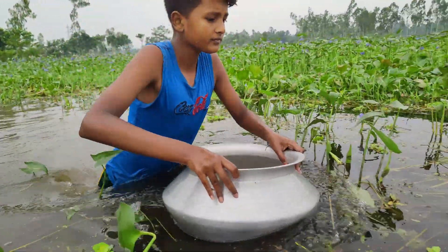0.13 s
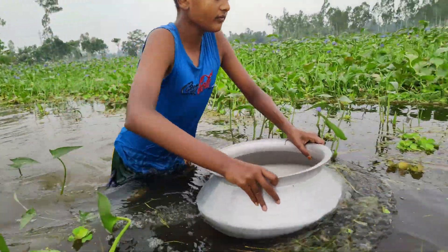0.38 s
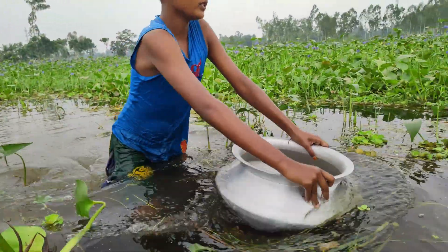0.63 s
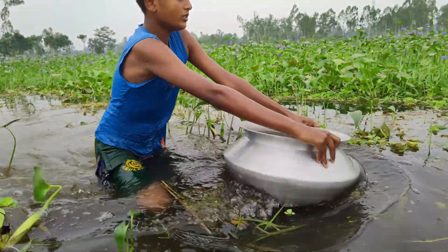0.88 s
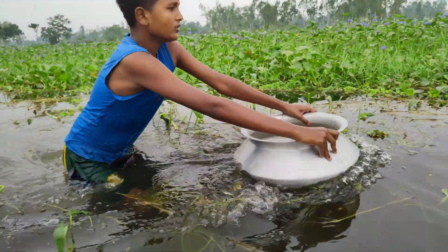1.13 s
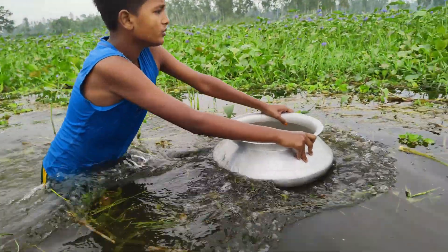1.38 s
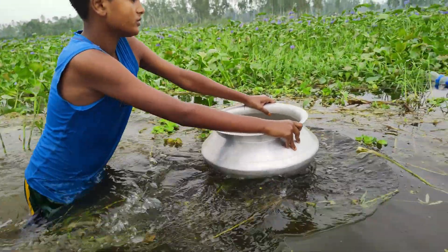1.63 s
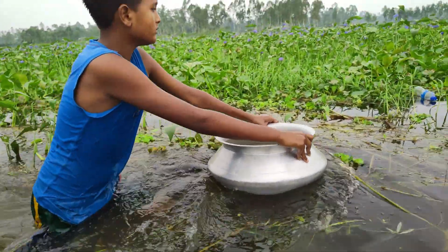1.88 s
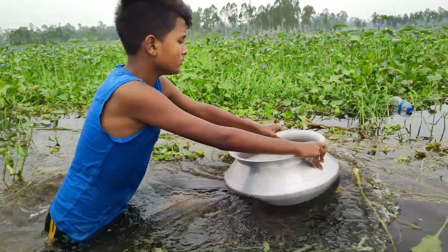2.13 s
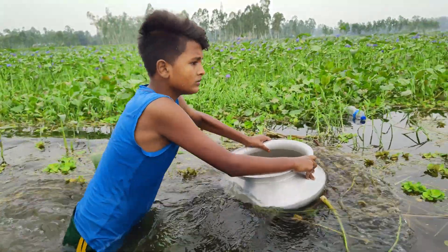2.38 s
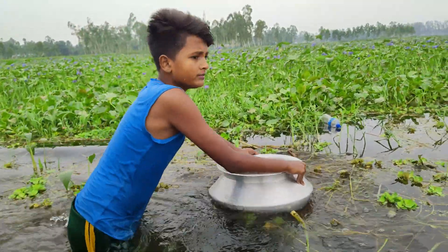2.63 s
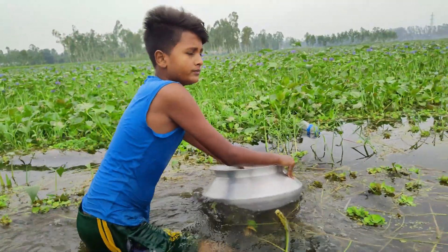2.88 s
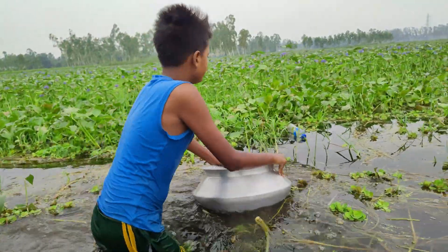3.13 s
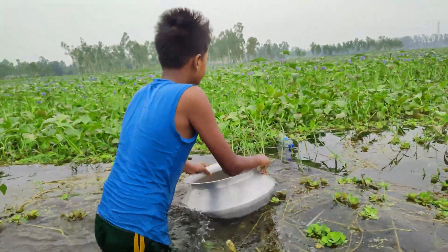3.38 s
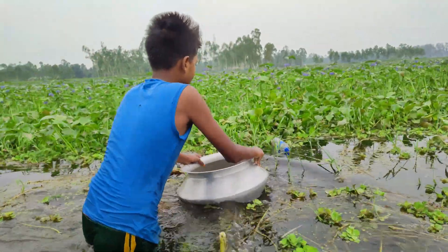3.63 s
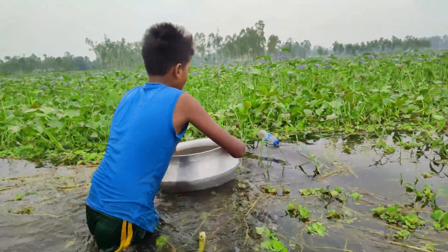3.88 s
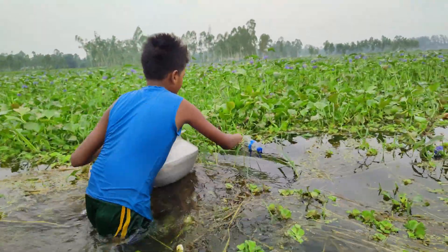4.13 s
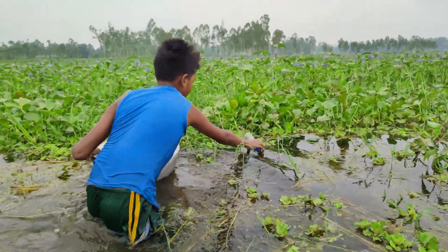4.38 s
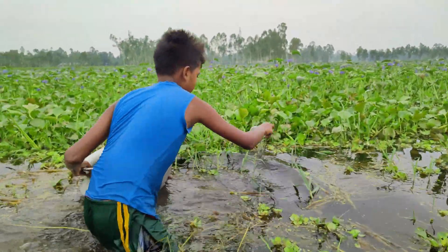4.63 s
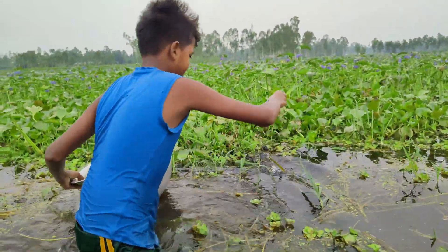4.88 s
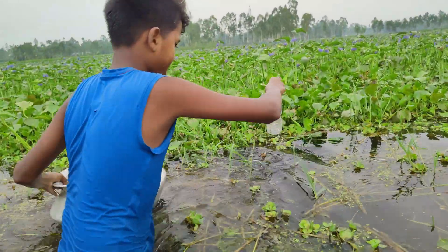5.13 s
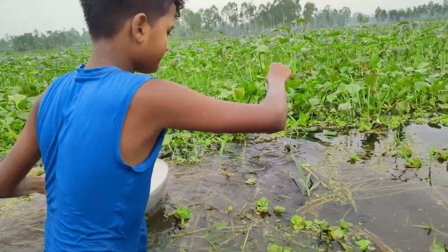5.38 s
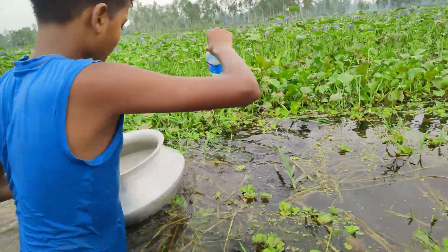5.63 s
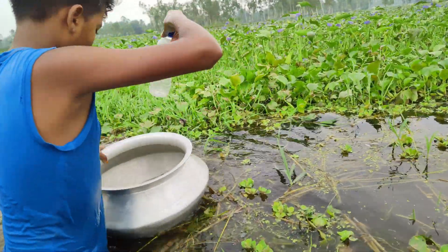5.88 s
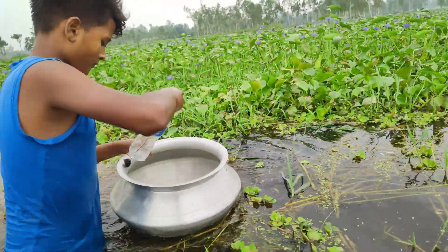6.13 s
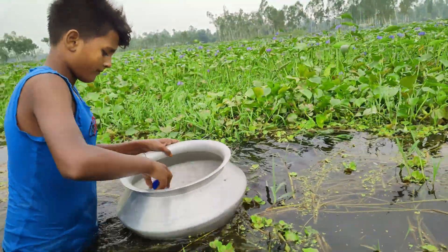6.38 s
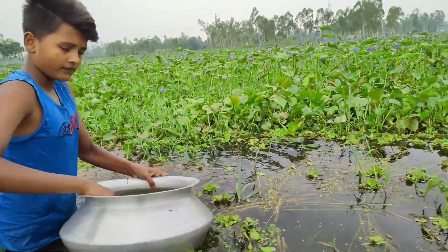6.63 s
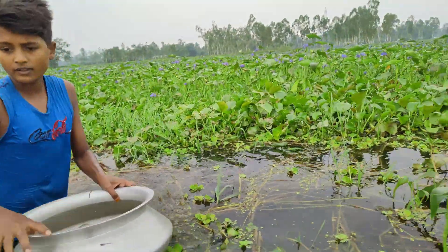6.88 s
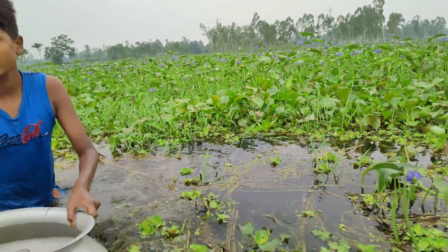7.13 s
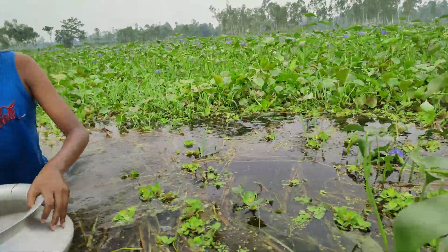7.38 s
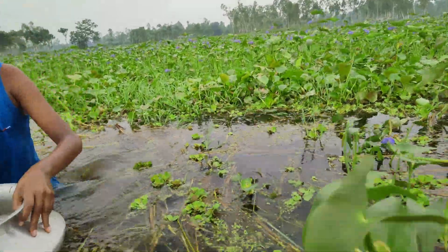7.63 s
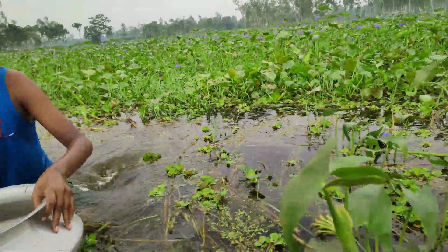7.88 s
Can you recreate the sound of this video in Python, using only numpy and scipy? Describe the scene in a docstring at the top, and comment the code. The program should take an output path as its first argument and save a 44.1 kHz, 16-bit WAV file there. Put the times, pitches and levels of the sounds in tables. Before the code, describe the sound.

Someone wades through shallow weedy water with bubbly sloshing, wind buffets the microphone, and a plastic bottle clatters into a floating metal pot.

```python
"""Wading with a floating pot

Someone wades through shallow floodwater: noise wash, swarms of rising sines and puffs of spray make the slosh.
A plastic bottle knocks and crackles on the floating metal pot (contact noise rings damped modes);
its lowest wall mode hums when stems drag along it. Floating leaves rustle as patchy noise.
Gusts, as low filtered pushes, buffet the two microphone ports separately, the left one most."""
import sys
import numpy as np
from scipy import signal
from scipy.fft import rfft, irfft, next_fast_len
from scipy.io import wavfile
from scipy.ndimage import uniform_filter1d, map_coordinates

SR = 44100
rng = np.random.default_rng(int(sys.argv[2]) if len(sys.argv) > 2 else 0)


def dump(signal):
    """Clip the signal to [-1, 1] and save it as 16-bit WAV at the path in sys.argv[1]."""
    limited = np.clip(np.atleast_2d(signal).T, -1, 1)
    pcm = np.round(limited * 32767).astype(np.int16)
    wavfile.write(sys.argv[1], SR, pcm)


def attenuation_scalar(level_db):
    """Turn a level in dB into a linear amplitude multiplier (20 dB per decade)."""
    decades = np.asarray(level_db, float) / 20
    return 10 ** decades


N = 353196

# Spectrum of the churned water. Each row: frequency in Hz, relative level in dB.
SLOSH_SPECTRUM = [(150, -11), (250, -9.5), (354, -16), (510, -13.5), (629, -7.5), (1140, -10.5),
                  (1700, -1.5), (3170, 0), (4400, -7), (4900, -18), (6600, -16), (7300, -32),
                  (11300, -26.5), (16000, -45)]
# Colour difference of the ports. Each row: frequency in Hz, left minus right in dB (sources scale it).
PORT_COLOUR = [(60, 7), (240, 1.5), (950, -2.5), (3770, -5.5), (15000, -15)]


def unit(x):
    """x scaled to rms 1."""
    return x / np.sqrt(np.mean(x ** 2) + 1e-20)


def along(points, hz):
    """(Hz, value) points interpolated on a log axis."""
    f, v = np.transpose(points)
    return np.interp(np.log(hz + 1), np.log(f + 1), v)


def curves(rows):
    """One value per sample for each column after the time."""
    s, *cols = np.transpose(rows)
    return [np.interp(np.arange(N) / SR, s, c) for c in cols]


def wobble(rate_hz):
    """A smooth random curve, rate_hz knots a second."""
    knots = rng.standard_normal(int(N * rate_hz / SR) + 4)
    return map_coordinates(knots, [np.arange(N) * rate_hz / SR])


def filtered(x, response):
    """x times a response of frequency."""
    m = next_fast_len(N + 8192)
    return irfft(rfft(x, m) * response(np.fft.rfftfreq(m, 1 / SR)), m)[..., :N]


def band(x, lo_hz, hi_hz):
    """x scaled so that one band of it has rms 1."""
    return x / np.std(filtered(x, lambda hz: (hz > lo_hz) & (hz < hi_hz)))


def swells(rows, rise_db_per_s, fall_db_per_s):
    """Level in dB of (s, dB, held s) events that rise, hold and fall; the strongest one rules."""
    t, out = np.arange(N) / SR, np.full(N, -200.)
    for s, db, held_s in rows:
        before_s, after_s = np.maximum(s - t, 0), np.maximum(t - s - held_s, 0)
        out = np.maximum(out, db - rise_db_per_s * before_s - fall_db_per_s * after_s)
    return out


def lead_at(s):
    """Seconds by which the left port hears the wader first."""
    # Each row: time in seconds, left lead in microseconds.
    bearing = [(0, 72), (.6, -100), (1.4, -13.5), (2.1, -100), (2.6, -4.5), (3.1, 265), (3.7, 31),
               (4.8, 63), (5.5, -200), (6.2, 249), (7.8, 443)]
    return np.interp(s, *np.transpose(bearing)) / 10 ** 6


def blips(s, db, hz, life_s, climb_oct, pan_db, lead_s):
    """Stereo sum of soft-starting sines whose pitch climbs linearly, at first by climb_oct octaves per life."""
    t = np.arange(int(np.max(life_s) * 2.5 * SR) + 8) / SR
    u = t / life_s[:, None]
    phase = 2 * np.pi * hz[:, None] * t * (1 + np.log(2) * climb_oct[:, None] * u / 2)
    envelope = np.e * 2.6 * u * np.exp(-2.6 * u)  # peaks at 1
    wave = attenuation_scalar(db)[:, None] * envelope * np.sin(phase)
    out = []
    for side in (1, -1):  # left, right
        at = np.round((s - side * lead_s / 2) * SR).astype(int)[:, None] + np.arange(len(t))
        gain = attenuation_scalar(side * pan_db / 2)[:, None]
        out.append(np.bincount(np.clip(at, 0, N).ravel(), (gain * wave).ravel(), N + 1)[:N])
    return np.array(out)


def bursts(s, db, t60_s, hz, width=0.55):
    """Tiny decaying puffs of noise around hz where droplets break; partly alike at the two ports."""
    starts = np.bincount(np.clip(np.round(s * SR).astype(int), 0, N - 1), attenuation_scalar(db), N)
    decay = attenuation_scalar(-60 * np.arange(SR // 40) / SR / t60_s)
    shape = signal.fftconvolve(starts, decay)[:N]
    shared, left, right = rng.standard_normal((3, N))
    noise = np.array([0.4 * shared + left, 0.53 * shared + right])
    hiss = filtered(noise, lambda f: np.exp(-(np.log((f + 1) / hz) / width) ** 2))
    return shape * unit(hiss) * attenuation_scalar([[-2.5], [2.5]])


def spray(hz):
    """Droplets breaking at random, with noise puffs around one frequency."""
    when, size = rng.random((600, 2)).T
    db = 6 * np.minimum(-np.log(1 - size), 4.5)
    return unit(bursts(when * N / SR, db, t60_s=.007, hz=hz, width=.28))


def swarm(count, mid_hz, spread, cycles, size_db, scatter_s, climb_oct=0.057):
    """Random bubbles of many sizes, scattered around the wader; the ports colour them."""
    u, g = rng.random((count, 2)), rng.standard_normal((count, 5))
    s = u[:, 0] * N / SR
    hz = np.clip(mid_hz * np.exp(spread * g[:, 0]), 400, 15000)
    db = size_db * np.minimum(-np.log(1 - u[:, 1]), 3.2)
    life_s = np.minimum(cycles * np.exp(0.19 * g[:, 1]) / hz, .02)
    pan_db = along(PORT_COLOUR, hz) + 4 * g[:, 3]
    lead_s = lead_at(s) + scatter_s * g[:, 4]
    crowd = blips(s, db, hz, life_s, climb_oct * np.abs(g[:, 2]), pan_db, lead_s)
    return filtered(crowd, lambda f: attenuation_scalar(along(SLOSH_SPECTRUM, f)))


def patchy(spectrum, patchy_db, alike):
    """Stereo noise with time-frequency patches of random gain; the ports differ ever more toward the treble."""
    z = signal.stft(rng.standard_normal((2, N)), nperseg=256)[2]
    patches = uniform_filter1d(uniform_filter1d(rng.standard_normal(z.shape[1:]), 9, 0), 4, 1)
    pair = signal.istft(z * attenuation_scalar(patchy_db * unit(patches)), nperseg=256)[1][:, :N]

    def mid_side(hz):
        angle = np.arccos(np.clip(alike, 0, 1) / (1 + (hz / 1500) ** 2)) / 2
        return attenuation_scalar(along(spectrum, hz)) * [np.cos(angle), np.sin(angle)]

    mid, side = filtered(pair, mid_side)
    stereo = np.array([mid + side, mid - side])
    return filtered(stereo, lambda hz: attenuation_scalar(np.outer([.5, -.5], along(PORT_COLOUR, hz))))


def water():
    """Churned water: a patchy wash, swarms of bubbles, low glugs and fine spray, coming in clumps."""
    # Each row: time in seconds, slosh level in dB.
    wade = [(0, -54.5), (.28, -47), (.61, -50.5), (1.01, -43), (1.59, -42.5), (2.37, -53), (2.6, -49.5),
            (3.11, -46.5), (3.81, -55), (3.98, -45.5), (4.1, -42.5), (4.27, -34), (4.6, -38), (4.82, -45.5),
            (5.32, -52), (5.45, -65), (6.25, -69.5), (6.55, -53), (7, -53), (7.83, -55.5), (8, -59.5)]
    # Short splashes. Each row: time in seconds, slosh level in dB, held seconds.
    splashes = [(1.045, -35.5, 0.011), (2.56, -40.5, 0.0066), (5.63, -52.5, 0.0038), (6.06, -49, 0.058),
                (6.86, -45, 0.0085), (7.08, -44, 0.03)]
    # Each row: time in seconds, low glugs over the slosh in dB.
    glug_levels = [(0, -7.5), (2.4, -7.5), (2.66, -17.5), (3.1, -7), (3.95, -14), (4.3, -7), (5.3, -13.5),
                   (5.6, -33), (6.1, -7.5), (6.7, -17), (7.3, -0.5), (8, 0)]
    slosh_db = np.maximum(curves(wade)[0], swells(splashes, rise_db_per_s=170, fall_db_per_s=260))
    spray_db = -65.5 + 0.44 * (slosh_db + 52.5)  # grows more slowly than the slosh
    glug_db = slosh_db + curves(glug_levels)[0]
    clumps_db = 2.2 * wobble(24)

    wash = patchy(SLOSH_SPECTRUM, patchy_db=5, alike=0.67)
    deep = filtered(wash, lambda hz: 1 / (1 + (hz / 1000) ** 4))
    foam = swarm(count=4200, mid_hz=2100, spread=.55, cycles=10.6, size_db=5.5, scatter_s=0.000091)
    ticks = swarm(count=2500, mid_hz=3300, spread=0.49, cycles=2.3, size_db=7, scatter_s=1e-4)
    chirps = swarm(count=350, mid_hz=1400, spread=.4, cycles=20, size_db=4, scatter_s=1e-4, climb_oct=.45)
    glugs = swarm(count=300, mid_hz=809.0, spread=0.304, cycles=13.7, size_db=-2.5, scatter_s=1e-4)
    mist = spray(hz=4120) + attenuation_scalar(-7.5) * (spray(hz=7600) + spray(hz=11900))

    layers = ((-5.5, wash - deep), (-3.5, foam), (-8, ticks), (-14, chirps))
    body = sum(attenuation_scalar(db) * band(x, 900, 5000) for db, x in layers)
    low = attenuation_scalar(-3.5) * band(deep, 660, 950) + attenuation_scalar(-3.5) * band(glugs, 660, 950)
    fine = attenuation_scalar(spray_db - 5.5) * band(mist, 5450, 12300)
    return attenuation_scalar(clumps_db) * (attenuation_scalar(slosh_db) * body + attenuation_scalar(glug_db) * low + fine)


def wind():
    """Single eddies strike each port as short low pushes; the hardest ones thump."""
    # Each row: seconds at full strength, level in dB, held seconds, port.
    gusts = [(0, -16, 0.085, "L"), (0, -26, 0.0033, "R"), (.17, -27, 0.0076, "R"),
             (0.221, -19.5, 0.082, "L"), (.28, -24.5, 0.027, "R"), (0.464, -29.5, 0.0053, "L"),
             (1.008, -30, 0.022, "L"), (1.297, -28.5, 0.0029, "L"), (1.417, -24.5, 0.048, "L"),
             (1.728, -34, 0.0029, "R"), (1.913, -28.5, 0.0089, "R"), (1.99, -37.5, 0.025, "L"),
             (2.07, -32, 0.012, "R"), (2.56, -27, 0.049, "L"), (3.381, -33, 0.0066, "R"),
             (4.177, -25.5, 0.053, "L"), (4.49, -37, 0.013, "L"), (5.098, -18, 0.032, "L"),
             (5.24, -34.5, 0.064, "L"), (5.377, -26, 0.0016, "L"), (5.515, -30.5, 0.0057, "L"),
             (5.54, -40.5, .27, "R"), (5.719, -32, 0.0044, "L"), (5.863, -24, 0.0031, "L"),
             (5.96, -27, 0.017, "L"), (6.14, -31, 0.13, "L"), (6.39, -37.5, 0.13, "L"),
             (6.63, -39, 0.012, "R"), (6.693, -23.5, 0.022, "L"), (6.85, -34.5, 0.05, "R"),
             (6.922, -18, 0.0028, "L"), (6.969, -28, 0.22, "L"), (7.05, -32, 0.0034, "R"),
             (7.181, -20.5, 0.04, "L"), (7.22, -25.5, 0.0041, "R"), (7.269, -17.5, 0.04, "L"),
             (7.3, -31.5, .35, "R"), (7.35, -25, 0.15, "L"), (7.507, -18.5, 0.003, "L"),
             (7.65, -39.5, 0.18, "L"), (7.971, -34, 0.023, "L")]
    # Between the gusts. Each row: time in seconds, left level in dB, right level in dB.
    breeze = [(0, -64, -47), (1.4, -37.5, -64), (1.9, -55.5, -45), (2.7, -42, -50.5), (3.7, -60.5, -58.5),
              (5, -51.5, -57), (8, -65, -47.5)]
    # Hardest eddies, left port. Each row: centre in seconds, level in dB, centre to peak in ms.
    thumps = [(1.436, -9.5, 2.03), (5.101, -16, 1.5), (5.139, -7.5, 1.12), (5.379, -12.5, 1.3),
              (5.857, -6, 2.38), (6.923, -5.5, 1.4)]
    # Spectrum of the pushes. Each row: frequency in Hz, relative level in dB.
    buffet = [(8, -32.5), (20, 5), (60, 5), (160, -6), (300, -17.5), (450, -43.5), (900, -52.5),
              (1500, -120)]
    # Spectrum of the turbulence. Each row: frequency in Hz, relative level in dB.
    rasp_spectrum = [(150, -16), (300, 9), (500, -1.5), (1000, -19), (2000, -87)]
    gust_db = [swells([row[:3] for row in gusts if row[3] == port], rise_db_per_s=288, fall_db_per_s=222)
               for port in "LR"]
    level_db = np.maximum(curves(breeze), gust_db)

    # about 220 strikes a second on a rolling bed
    strikes = rng.standard_normal((2, N)) * (.05 + (rng.random((2, N)) < 220 / SR))
    eddies = unit(filtered(strikes, lambda hz: attenuation_scalar(along(buffet, hz))))
    running_rms = np.sqrt(np.abs(uniform_filter1d(eddies ** 2, SR // 14)) + 0.0069)
    # harder gusts shed smaller eddies that flutter in the port, a 170 Hz resonance
    edge = filtered(eddies, lambda hz: 1j * hz * 160 / (170 ** 2 - hz ** 2 + 1j * hz * 160))
    edge_db = 11.5 + 0.44 * level_db
    push = attenuation_scalar(level_db) * (eddies + attenuation_scalar(edge_db) * edge) / running_rms

    t = np.arange(N) / SR
    for s, db, half_ms in thumps:
        u = (t - s) * 1000 / half_ms
        push[0] -= attenuation_scalar(db) * u * np.exp((1 - u ** 2) / 2)  # pressure rises, then snaps back

    distortion = filtered(push * np.abs(push), lambda hz: hz ** 2 / (hz ** 2 + 250 ** 2))
    # turbulence riding on the strongest pushes
    rasp = unit(filtered(rng.standard_normal((2, N)), lambda hz: attenuation_scalar(along(rasp_spectrum, hz))))
    return push + 1.32 * distortion + attenuation_scalar(1.797 * level_db) * rasp


def leaves():
    """Floating leaves rustle as patchy noise, more when the stems are brushed."""
    # Each row: time in seconds, level in dB.
    rustle = [(0, -85.5), (6.85, -58.5), (7.3, -54.5), (7.55, -44), (7.74, -57.5), (7.95, -47.5)]
    # Each row: frequency in Hz, relative level in dB.
    leaf_spectrum = [(100, -41), (430, -31), (600, -17), (1500, -24), (2300, -0.5), (4400, -12),
                     (4900, -23.5), (6600, -20.5), (7300, -31.5), (16000, -60)]
    return attenuation_scalar(curves(rustle)[0]) * band(patchy(leaf_spectrum, patchy_db=4, alike=.7), 900, 5000)


def bubbles():
    """Single bubbles ring as climbing sines; the surface snaps as each one forms."""
    # Each row: start in seconds, relative level in dB, start pitch in Hz, life in ms.
    single_bubbles = [(.07, -33, 2000, 6.3), (.114, -27.5, 1980, 1.3), (.232, -38, 1700, 4.2),
                      (.251, -29, 2170, 1.5), (0.285, -28.5, 2100, 4.8), (0.553, -35.5, 2480, 5.2),
                      (0.786, -36, 427, 20), (1.035, -30, 2240, 5.2), (1.017, -32, 3980, 0.84),
                      (1.052, -17, 2670, 0.41), (1.057, -37, 1750, 5.6), (1.226, -31, 2380, 1.9),
                      (1.494, -33, 2400, 2.5), (1.171, -38, 1236, 22), (1.467, -27.5, 2104, 5.8),
                      (1.546, -30, 2880, 1.8), (1.58, -32.5, 3100, 3), (1.641, -31.5, 2580, 8.2),
                      (1.691, -32, 3460, 2.9), (1.771, -29, 3650, 0.67), (1.815, -33.5, 1840, 4.3),
                      (1.896, -36.5, 3830, 4.7), (1.938, -27.5, 2390, 3.8), (2.661, -36, 1670, 2.4),
                      (2.247, -36.5, 503, 21), (2.741, -37.5, 1990, 5.1), (2.852, -37.5, 2410, 6),
                      (3.071, -27, 2260, 2.2), (3.146, -36, 795, 14), (3.341, -36, 1960, 8.5),
                      (3.348, -40, 1360, 11), (3.362, -43.5, 476, 37), (3.468, -38.5, 727, 20),
                      (3.55, -41.5, 566, 24), (3.944, -38, 3200, 4), (3.947, -40, 1230, 10),
                      (3.975, -41, 3900, 4), (4.082, -25, 3150, 3.2), (4.097, -32.5, 926, 5.8),
                      (4.136, -26.5, 2040, 3.5), (4.167, -29, 3020, 4), (4.176, -18.5, 2320, 0.92),
                      (4.188, -31, 910, 10), (4.244, -29, 2100, 3.7), (4.259, -28, 3010, 4.9),
                      (4.21, -32.5, 1200, 8.9), (4.267, -23.5, 1730, 2.6), (4.308, -26.5, 934, 5.6),
                      (4.362, -27.5, 766, 3.5), (4.374, -31.5, 3950, 1.4), (4.395, -32, 1330, 6.2),
                      (5.116, -28.5, 2000, 0.47), (5.925, -37, 3700, 1.05), (7.019, -33, 724, 17.7),
                      (7.104, -35.5, 1850, 3), (7.232, -30.5, 3560, 1.8), (7.396, -39.5, 2920, 4),
                      (7.535, -40, 2250, 7), (7.61, -37, 750, 14), (7.671, -26, 2220, 1.7),
                      (7.84, -45, 740, 12)]
    s, db, hz, life_ms = np.transpose(single_bubbles)
    climb_oct = .0007 * life_ms ** 2  # longer lives climb further
    pan_db = 3.7 * along(PORT_COLOUR, hz)
    rings = blips(s, db - 1.0, hz, life_ms / 1000, climb_oct, pan_db, lead_at(s))
    return rings + bursts(s, db - 14, t60_s=.008, hz=3300)


def drops():
    """Drops burst on the surface as puffs of noise."""
    # Each row: start in seconds, relative level in dB.
    bursting = [(.232, -37), (.35, -42), (1.053, -33), (1.6077, -31), (1.774, -31), (2.8392, -38),
                (3.1074, -31), (3.345, -34), (4.1198, -30.5), (4.1633, -26), (4.4105, -26), (4.554, -27),
                (4.645, -34), (5.283, -29.5), (5.609, -38.5), (6.044, -31), (6.06, -31.5), (6.332, -27),
                (7.6718, -25)]
    s, db = np.transpose(bursting)
    return bursts(s, db - 11.0, t60_s=0.011, hz=5800, width=0.58)


def plops():
    """Deep plops ring at a steady pitch."""
    # Each row: start in seconds, level in dB, pitch in Hz, life in ms.
    deep_plops = [(.645, -41.5, 454, 29), (1.056, -34.5, 682, 10), (1.175, -34, 606, 11),
                  (2.828, -37.5, 460, 14)]
    s, db, hz, life_ms = np.transpose(deep_plops)
    return blips(s, db, hz, life_ms / 1000, np.zeros(len(s)), along(PORT_COLOUR, hz), lead_at(s))


def pockets():
    """Air pockets whistle upward as they close."""
    # Each row: start in seconds, level in dB, life in seconds, initial climb in octaves per life.
    closing = [(0.99, -46, .03, 1.1), (1.378, -46, 0.04, 2.3), (2.194, -43, 0.033, 1.07),
               (2.867, -51, 0.03, 1.8), (3.215, -39.5, 0.028, 0.82), (5.872, -58, 0.032, 2)]
    s, db, life_s, climb_oct = np.transpose(closing)
    hz = np.full(len(s), 742)
    return blips(s, db, hz, life_s, climb_oct, 2.1 * along(PORT_COLOUR, hz), lead_at(s))


def drags():
    """Stems dragging on the pot hum its lowest wall mode, loaded by water, with wavering pitch and level."""
    # Each row: start in seconds, hum level in dB, held seconds.
    stems = [(2.356, -40, 0.0038), (2.41, -39, 0.17), (4.68, -39, 0.074), (4.966, -39, 0.0027),
             (5.58, -53.5, 0.1), (6.9, -44.5, 0.049)]
    db = swells(stems, rise_db_per_s=850, fall_db_per_s=1200)
    hz = 583 + 25 * wobble(150)
    return attenuation_scalar(db + 3 * wobble(40) + 3 * wobble(130)) * np.sin(2 * np.pi * np.cumsum(hz) / SR)


def pot_wall(t):
    """Damped wall modes of the pot; each mode is two rings, randomly detuned and out of step."""
    # Each row: mean frequency in Hz, mean relative level in dB, t60 in seconds.
    modes = [(680, 5.5, 0.013), (1300, 5, 0.016), (1537, 10, 0.022), (1850, 6, 0.018), (2234, 7, 0.024),
             (2500, 0, 0.02), (2850, 1, 0.02), (3120, 6, 0.02), (3680, 0, 0.02), (4200, -2, 0.02),
             (4780, -5, 0.02), (6200, -7, 0.02)]
    wall = np.zeros(len(t))
    for k, (hz, db, t60_s) in enumerate(modes + modes):
        decay = attenuation_scalar(db + rng.normal(0, 2) - 60 * t / t60_s)
        phase = 2 * np.pi * hz * rng.normal(1, .015) * t + rng.normal(0, .8)
        wall += (-1) ** k * decay * np.sin(phase)
    return wall


def knocks():
    """Each knock rings the wall modes through a crackle of tiny contacts, and thuds the air inside."""
    # Each row: start in seconds, level in dB, thud relative to it in dB, crackle t60 in seconds,
    # hardness in Hz (top of the contact band).
    pot_knocks = [(4.547, -22.5, -2, 0.011, 6000), (5.612, -35, 2, 0.072, 9000),
                  (6.299, -9.5, -33, 0.095, 8700), (6.347, -18.5, -21, 0.12, 8950),
                  (6.356, -23, 1, 0.087, 4860), (6.486, -18.5, -18.5, 0.095, 9300),
                  (6.508, -37, 9, 0.05, 7100), (6.612, -39.5, 16.5, 0.21, 5100),
                  (6.632, -35, 11, 0.063, 5920), (6.794, -5, -10.5, 0.044, 3250)]
    out, t = np.zeros((2, N + SR)), np.arange(SR // 4) / SR
    # the broad clack of plastic
    clack = attenuation_scalar(14 - 60 * t / .003) * (np.sin(2 * np.pi * 2500 * t) - .35 * np.sin(2 * np.pi * 5600 * t))
    for s, db, thud_db, crackle_s, hard_hz in pot_knocks:
        tail_db = -26.0 - 60 * t / 0.33 + 2.8 * wobble(90)[:len(t)]
        fading = attenuation_scalar(-60 * t / crackle_s) + attenuation_scalar(tail_db)
        contacts = rng.laplace(size=len(t)) * fading * (1 - np.exp(-t / 0.00047))
        edges_hz = [hard_hz / 5.5, min(hard_hz, 15000)]
        contacts = signal.sosfilt(signal.butter(3, edges_hz, "bandpass", fs=SR, output="sos"), contacts)
        dull = signal.sosfilt(signal.butter(2, 3500, fs=SR, output="sos"), contacts)
        contacts = dull + (contacts - dull) * attenuation_scalar(-60 * t / crackle_s)  # the treble settles first

        # air in the pot, its belly, lowest wall mode: dB, Hz, t60 s
        low_modes = ((thud_db, 259, 0.088), (thud_db - 8.5, 316, 0.13), (-13.5 + 0.67 * thud_db, 590, 0.16))
        low = sum(attenuation_scalar(g - 60 * t / t60_s) * np.sin(2 * np.pi * hz * t) for g, hz, t60_s in low_modes)
        low = low * (1 - np.exp(-t / 0.0034))
        waver = attenuation_scalar(4 * wobble(45)[:len(t)])  # the low ring wavers roughly in level

        for side, row in zip((1, -1), out):
            ring = signal.fftconvolve(pot_wall(t) / 2 + clack, contacts)[:len(t)]
            ring /= 2.0 * np.std(ring[:SR // 80])
            start = round((s - side * lead_at(s) / 2) * SR)
            row[start:][:len(t)] += attenuation_scalar(db) * (attenuation_scalar(-1.5 * side) * ring + low * waver)
    return out[:, :N]


def scene():
    """Water, wind, leaves, single bubbles and drops, and the pot."""
    surface = bubbles() + drops() + plops() + pockets()
    pot = drags() + knocks()
    return water() + wind() + leaves() + surface + pot


def band_limit(x):
    """A steep low-pass at the top of the band."""
    return signal.sosfilt(signal.butter(12, 16260, fs=SR, output="sos"), x)


def record(dry):
    """The microphones hiss faintly and the input stage rounds off the hardest gusts."""
    hiss = filtered(rng.standard_normal(dry.shape), lambda hz: hz ** 2 / (hz ** 2 + 5000 ** 2))
    mic = dry + attenuation_scalar(-74) * hiss
    rounded = mic / (1 + np.abs(mic / .9) ** 3) ** (1 / 3)
    return band_limit(rounded)


dry = scene()
out = record(dry)
dump(out)
```